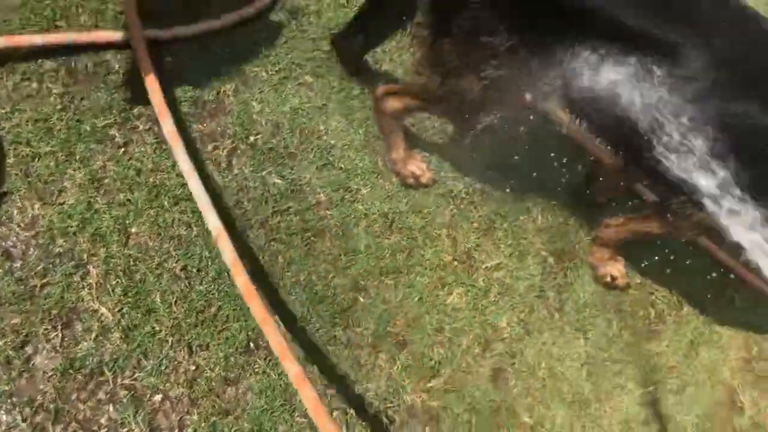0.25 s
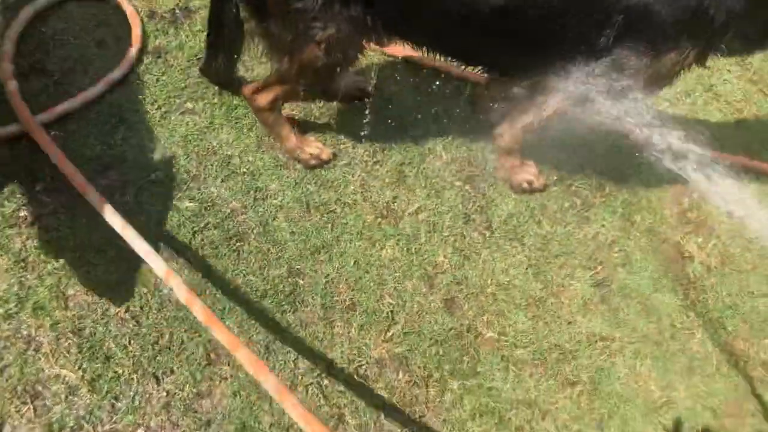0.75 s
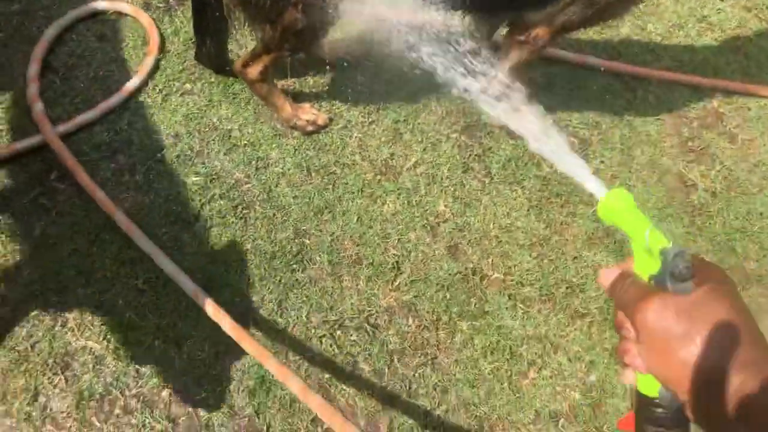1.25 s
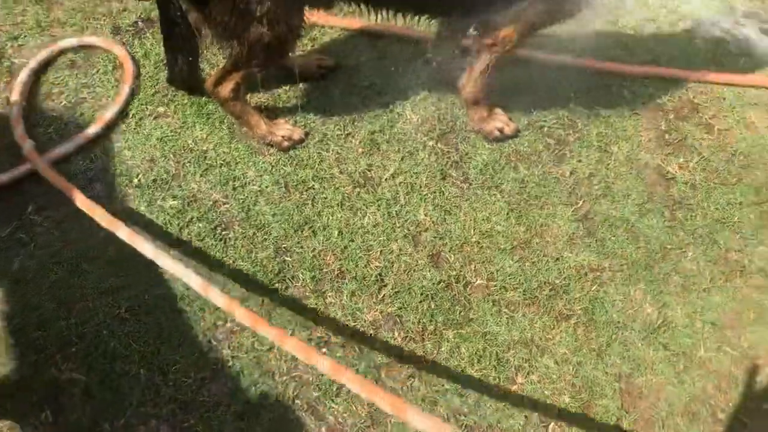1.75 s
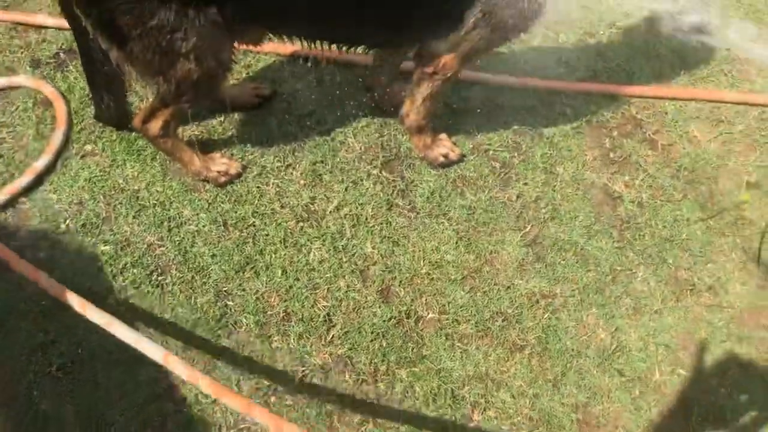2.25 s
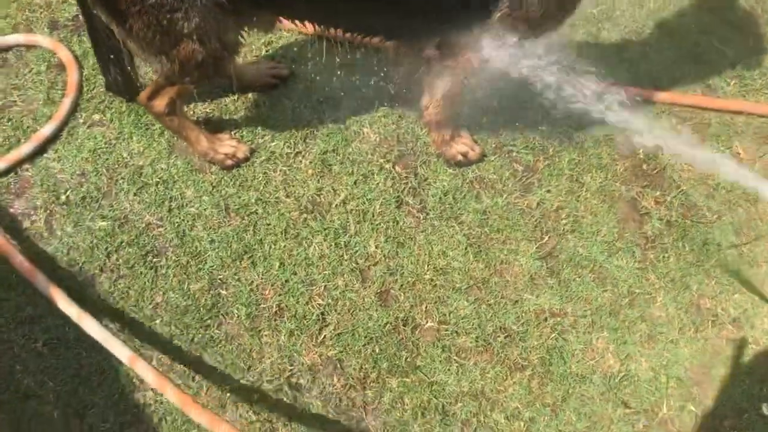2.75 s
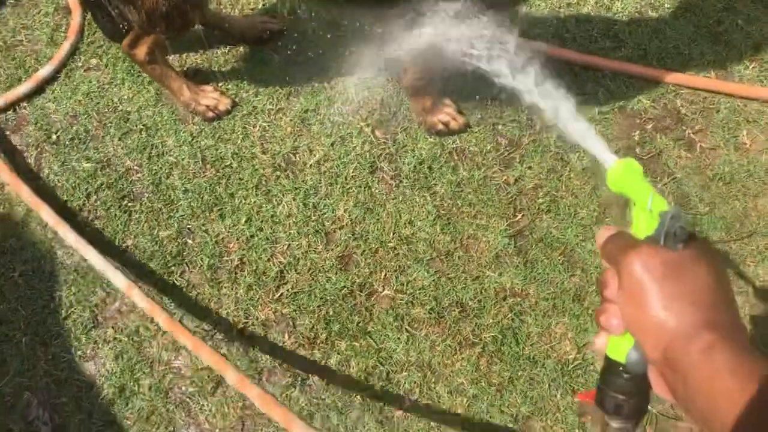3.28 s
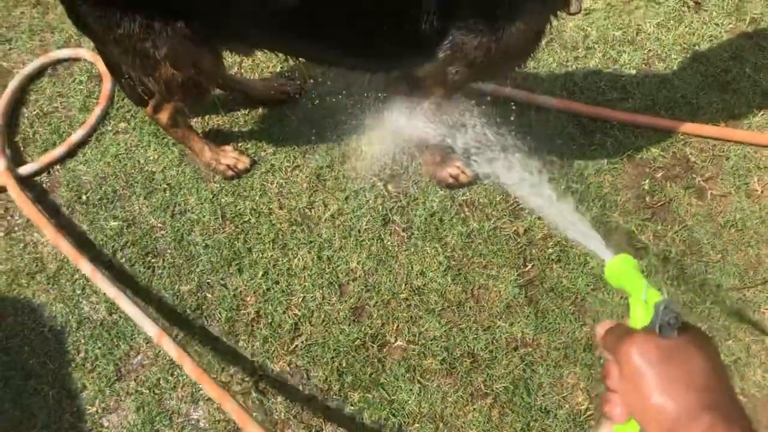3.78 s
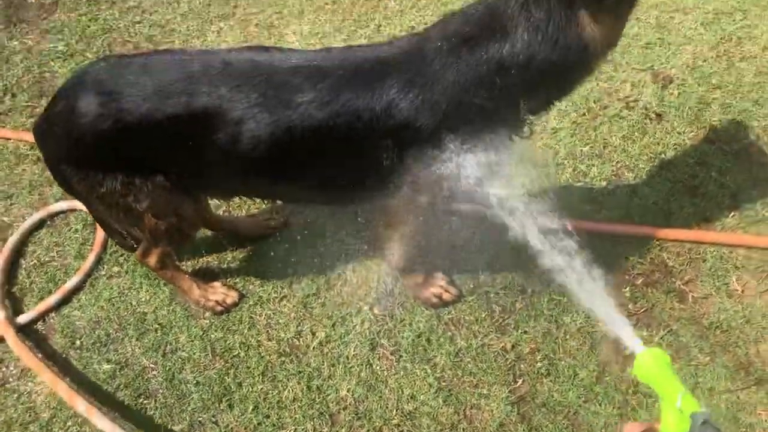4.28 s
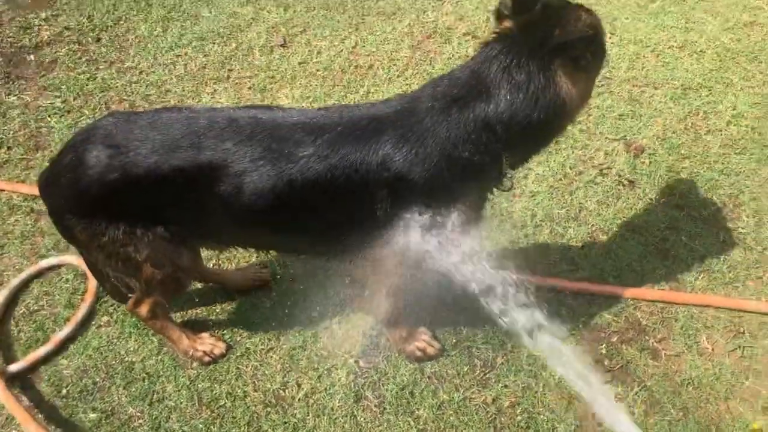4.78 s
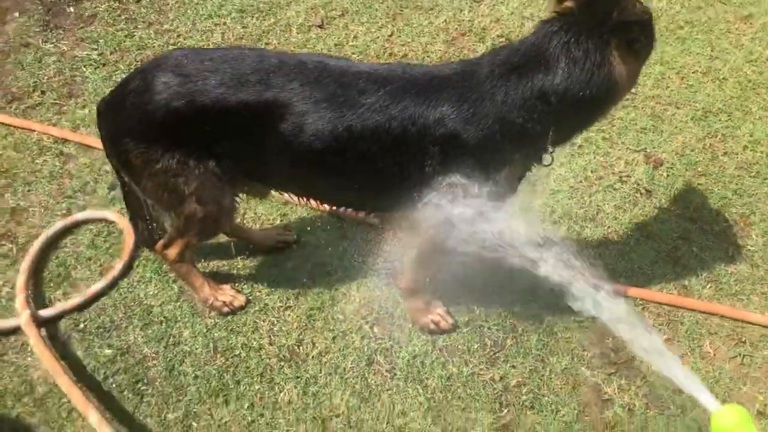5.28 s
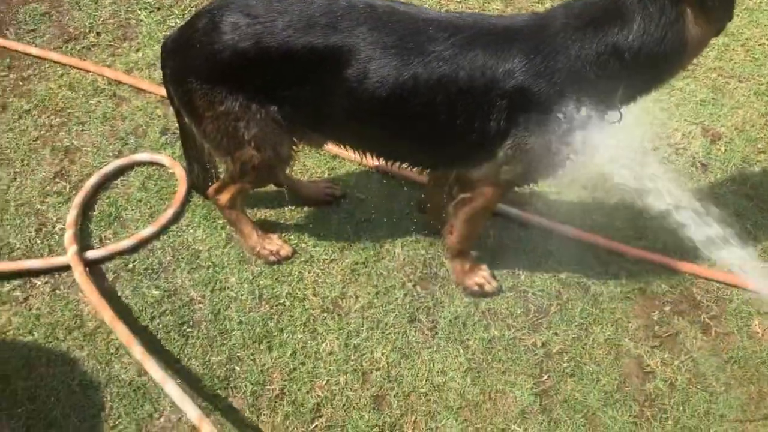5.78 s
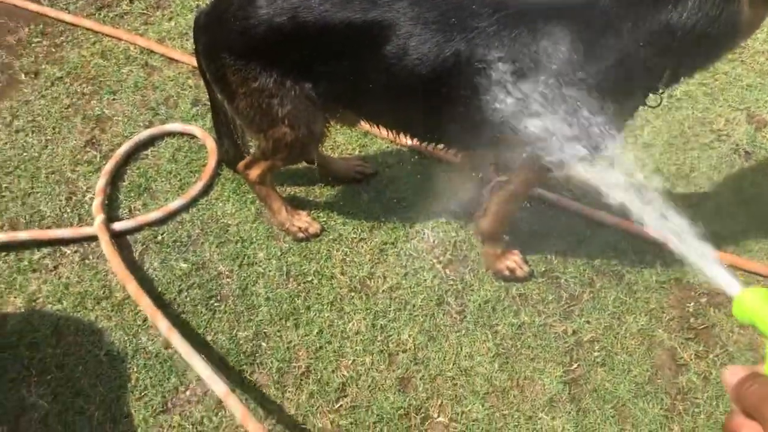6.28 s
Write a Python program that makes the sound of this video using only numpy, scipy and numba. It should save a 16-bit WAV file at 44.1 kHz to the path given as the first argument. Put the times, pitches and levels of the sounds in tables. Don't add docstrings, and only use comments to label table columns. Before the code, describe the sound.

Bright, whistling water spray hisses without pause, pattering on soaked fur and grass outdoors; distant vehicles rumble and two soft knocks come late.

```python
import sys
import numpy as np
from scipy import signal
from scipy.fft import rfft, irfft
from scipy.io import wavfile
from scipy.ndimage import uniform_filter1d, map_coordinates
from numba import njit

SR = 44100
rng = np.random.default_rng(int(sys.argv[2]) if len(sys.argv) > 2 else 0)


def wav_record(signal):
    frames = np.transpose(np.atleast_2d(signal))
    bounded = np.clip(frames, -1, 1)
    quanta = np.round(bounded * 32767).astype(np.int16)
    wavfile.write(sys.argv[1], SR, quanta)


def ratio_of_db(decibels):
    return 10 ** (np.asarray(decibels, float) / 20)


N = 288352
TIME = np.arange(N) / SR


def unit(x):
    return x / np.sqrt(np.mean(x ** 2))


def noise():
    return rng.standard_normal(N)


def tone(hz):
    return np.sin(2 * np.pi * np.cumsum(hz) / SR)


def curves(table):
    s, *columns = np.transpose(table)
    return [np.interp(TIME, s, column) for column in columns]


def swells(events, floor_db, column):
    power = np.full(N, ratio_of_db(floor_db) ** 2)
    for row in events:
        middle, length = row[:2]
        start = max(int((middle - length / 2) * SR), 0)
        span = slice(start, int((middle + length / 2) * SR))
        power[span] += ratio_of_db(row[column]) ** 2 * np.cos(np.pi * (TIME[span] - middle) / length) ** 2
    return 10 * np.log10(power)


def walk(rate):
    hold = int(SR / rate)
    steps = np.repeat(rng.standard_normal(N // hold + 1), hold)
    return 1.1 * uniform_filter1d(uniform_filter1d(steps, hold), hold)[:N]


@njit
def svf(x, hz, q):
    y, band, low, damping = np.empty(len(x)), 0., 0., 1 / q
    for i in range(len(x)):
        g = np.tan(np.pi * hz[i] / SR)
        v = (band + g * (x[i] - low)) / (1 + g * (g + damping))
        band, low, y[i] = 2 * v - band, low + 2 * g * v, damping * v
    return y


def ring(x, hz, q):
    hz = np.clip(hz + np.zeros(N), 20, .42 * SR)
    return unit(svf(svf(x, hz, q), hz, q) / np.sqrt(hz))


def drops(per_s, spread_db, stream):
    size = np.minimum(rng.exponential(size=N), 3.5)
    landed = rng.random(N) < per_s / SR
    hits = landed * ratio_of_db(spread_db * size) * rng.choice([-1, 1], N)
    return unit(hits) + stream * noise()


def echo(x, delay_ms):
    return map_coordinates(x, [np.arange(N) - delay_ms * SR / 1000], order=2)


# (t/s, bore whistle f/Hz, hiss level/dB with distance, splash centre f/Hz)
GUN_HAND = [(0, 7540, -30.5, 4630), (.32, 7700, -28, 4250), (.6, 7200, -31, 4540), (.9, 7370, -30.7, 4470),
            (1.2, 7900, -30, 4550), (1.7, 7600, -30.5, 4150), (2.1, 7400, -30, 4400),
            (2.5, 7640, -29.5, 3930), (3.1, 7600, -29.2, 4300), (3.5, 7700, -29, 3970),
            (3.8, 7000, -30.5, 4020), (4.25, 6600, -30.5, 3870), (4.55, 6600, -29.1, 3500),
            (4.9, 7000, -30.8, 3100), (5.35, 7500, -29.5, 3630), (5.7, 7600, -32.5, 3920),
            (6.0, 7700, -31, 3740), (6.54, 7900, -27.5, 4040)]
# (middle t/s, length t/s, splash level/dB, mist level/dB)
SPRAY_SHEETS = [(0.02, 0.41, -32.5, -40.5), (0.26, 0.82, -35.5, -37.5), (0.72, 0.48, -41, -43.0),
                (0.96, 0.45, -39.5, -46), (1.34, 0.34, -39, -42), (1.54, 0.32, -37.0, -43),
                (1.75, 0.51, -36, -41.5), (2.03, 0.24, -35.5, -39), (2.26, 0.28, -33.5, -39),
                (2.4, 0.17, -29.5, -39), (2.56, 0.38, -30, -39), (2.66, 0.45, -40.0, -42.0),
                (2.92, 0.34, -45, -41), (3.06, 0.18, -34.5, -40), (3.22, 0.6, -41.5, -40.5),
                (3.39, 0.25, -35.5, -39), (3.55, 0.35, -35.5, -40.5), (3.68, 0.43, -39.5, -40),
                (3.91, 0.24, -34.5, -37), (4.15, 0.45, -31.5, -37), (4.3, 0.16, -38, -38),
                (4.4, 0.62, -31.5, -39), (4.72, 0.52, -35.5, -41.5), (4.97, 0.73, -36.5, -41),
                (5.27, 0.55, -38, -40.5), (5.5, 0.74, -31, -42), (5.77, 0.23, -33.0, -41),
                (5.98, 0.29, -30.5, -39), (6.17, 0.34, -30.5, -37.5), (6.42, 0.48, -30.5, -36.5)]
# (t/s, delay via the lawn/ms, share/1, delay via the dog's flank/ms, share/1)
NOZZLE_ECHOES = [(0, 4.2, .2, 5.1, .1), (.65, 4.1, 0.31, 9, .1), (1.1, 4.4, .3, 7, .2),
                 (1.4, 4.5, .05, 8.5, .2), (1.5, 4.0, .05, 6.45, .2), (1.65, 4.0, .35, 6.8, 0.22),
                 (1.95, 4.5, .25, 6.4, 0.41), (2.3, 3.3, .05, 6.4, .05), (2.8, 4.9, .15, 5.1, .05),
                 (3.2, 5, .3, 4.8, 0.21), (3.75, 6.2, 0.18, 4.7, .05), (4.5, 4.6, .05, 9.1, .05),
                 (5.1, 4.9, 0.38, 5, .15), (5.4, 5.2, .3, 4.8, .3), (5.9, 4.6, .25, 6.7, 0.23),
                 (6.54, 5.0, .1, 5.5, .1)]


def nozzle():
    whistle_hz, hiss_db, _ = curves(GUN_HAND)
    hiss_hz = 7500 + .55 * (whistle_hz - 7500)
    mist_db = swells(SPRAY_SHEETS, -43.5, 3)
    lawn_ms, lawn, flank_ms, flank = curves(NOZZLE_ECHOES)

    sputter = walk(9.6)
    hiss_db = hiss_db - 2.3 + 0.95 * sputter + 1.2 * walk(14) + 0.49 * walk(35)
    fizz_db = mist_db + 5.3 + .8 * sputter + 1.1 * walk(13)
    fine_db = mist_db + 6.5 + .8 * sputter + 1.4 * walk(18) + .6 * walk(30)
    hiss = ring(drops(9000, 3.0, 1.4), hiss_hz, 1.63) * ratio_of_db(hiss_db)
    fizz = ring(drops(9000, 2.5, 1.4), 8430, 0.85) * ratio_of_db(fizz_db)
    mist = ring(drops(9000, 2.2, 1.9), 15450, 0.68) * ratio_of_db(fine_db)

    jet = hiss + fizz
    back = lawn * echo(jet, lawn_ms) + flank * echo(jet, flank_ms)
    return (jet + back) / np.sqrt(1 + lawn ** 2 + flank ** 2) + mist


def whistle():
    hz, hiss_db, _ = curves(GUN_HAND)
    wavering_hz = hz * (1 + .035 * walk(9))
    return ring(noise(), wavering_hz, 6.5) * ratio_of_db(hiss_db - 7 + 2.4 * walk(10))


# (middle t/s, length t/s, drumming level/dB, slap level/dB)
COAT_STROKES = [(0.05, 0.2, -34.5, -48), (0.2, 0.32, -31, -37.5), (0.27, 0.25, -27.5, -45),
                (0.43, 0.33, -31, -39), (0.63, 0.22, -42, -39.5), (0.8, 0.27, -38, -39.5),
                (0.98, 0.35, -36.5, -45), (1.36, 0.36, -32.5, -58.0), (1.61, 0.53, -34.5, -44),
                (1.71, 0.16, -31, -46), (1.84, 0.25, -46.5, -43), (2.03, 0.21, -35, -39),
                (2.25, 0.24, -35, -39), (2.43, 0.33, -35, -52), (2.58, 0.18, -34.5, -58.0),
                (2.7, 0.27, -33, -58.0), (3.05, 0.17, -38, -58.0), (3.37, 0.21, -32.5, -58.0),
                (3.62, 0.18, -32.5, -58.0), (4.0, 0.34, -33.0, -55.5), (4.25, 0.39, -35, -38.5),
                (4.37, 0.11, -35, -39), (4.63, 0.64, -37.0, -39.5), (4.9, 0.52, -42.5, -40.5),
                (5.28, 0.58, -38.5, -36.5), (5.53, 0.34, -42, -35), (5.73, 0.39, -36, -38),
                (5.98, 0.27, -33.5, -33.5), (6.18, 0.3, -33.5, -33.5), (6.41, 0.39, -34, -31)]
# (t/s, drumming centre f/Hz)
COAT_PATCH = [(0, 1170), (.16, 1390), (.3, 1250), (.5, 1460), (1.07, 1430), (1.3, 1440), (1.75, 1500),
              (2.05, 1420), (2.3, 1400), (2.55, 1430), (2.72, 1230), (3.06, 1520), (3.4, 1310),
              (3.62, 1460), (4.0, 1370), (5.26, 1340), (5.9, 1300), (6.54, 1450)]


def drum(surge):
    drum_db = swells(COAT_STROKES, -44.5, 2)
    drum_hz = curves(COAT_PATCH)[0] * (1 + .03 * walk(8))
    skin = np.zeros(N)
    for ratio, db in ((.72, -3.5), (1.01, 0.5), (1.33, -2)):
        waver = ratio_of_db(db + 1.06 * walk(14))
        skin += waver * ring(drops(3000, 3.9, 1.07), ratio * drum_hz, 1.84)
    return unit(skin) * ratio_of_db(drum_db + 0.72 * surge + 0.42 * walk(40))


def slap(surge):
    slap_db = swells(COAT_STROKES, -52.5, 3)
    slap_hz = 2300 * (1 + 0.09 * walk(10))
    return ring(drops(4000, 2.5, 1.17), slap_hz, 1.1) * ratio_of_db(slap_db + 0.68 * surge + 0.65 * walk(25))


def splash(surge):
    splash_db = swells(SPRAY_SHEETS, -42, 2)
    splash_hz = curves(GUN_HAND)[2]
    fine = drops(5000, 4.5, 0.83)
    spatter = ring(fine, splash_hz, 0.87) + ratio_of_db(2.5) * ring(fine, 4900, 0.6)
    return unit(spatter) * ratio_of_db(splash_db + 1.4 * surge + 0.29 * walk(30))


def landing():
    surge = walk(18)
    return drum(surge) + slap(surge) + splash(surge)


# (start t/s, length t/s, f/Hz, level/dB)
WET_HOLLOWS = [(.1, 0.37, 2240, -47), (1.66, 0.2, 1970, -44), (2.3, 0.42, 3400, -40.5),
               (2.32, 0.25, 4600, -41), (2.546, 0.19, 367, -50.5), (3.3, 1, 420, -53),
               (4.092, 0.41, 2800, -43), (4.118, .35, 4000, -43), (4.62, .72, 3220, -38.5),
               (2.75, 1.2, 2850, -48), (5.3, 0.32, 2427, -45), (5.88, 0.15, 2720, -36.5),
               (6.14, 0.1, 1400, -36), (6.325, 0.11, 1430, -33.5), (6.15, 0.4, 116, -44),
               (0, 0.23, 430, -48.5)]


def hollows():
    out = np.zeros(N)
    for start, length, hz, db in WET_HOLLOWS:
        swell = np.sin(np.pi * np.clip((TIME - start) / length, 0, 1))
        out += ratio_of_db(db) * swell * ring(noise(), hz, 5.6)
    return out * ratio_of_db(1.5 * walk(17))


# (f/Hz, level/dB per Hz)
YARD_COLOUR = [(15, -42), (25, -21), (54, -1.5), (81, 3), (109, -1), (168, -7.5), (217, -9.5), (401, -8),
               (509, -14), (719, -12), (900, -16.5), (1170, -34), (1980, -120)]


def yard():
    hz = np.fft.rfftfreq(N, 1 / SR) + 1
    colour_hz, colour_db = np.transpose(YARD_COLOUR)
    colour = np.interp(np.log(hz), np.log(colour_hz), colour_db)
    return unit(irfft(rfft(noise()) * ratio_of_db(colour), N)) * ratio_of_db(-43.5)


# (middle t/s, length t/s, level/dB)
FAR_VEHICLES = [(0, .24, -37), (.35, 0.54, -44), (1.1, 1.6, -42), (1.9, .6, -47), (2.42, 0.31, -54),
                (2.9, .5, -45), (3.26, .24, -40), (3.65, .8, -42), (4.1, 0.44, -46), (4.45, 0.78, -40),
                (5.02, .5, -41), (5.24, .14, -31), (6.25, .8, -39)]


def traffic():
    rumble_db = swells(FAR_VEHICLES, -53.5, 2)
    hum_hz = 77.8 + (90.7 - 77.8) * np.exp(-TIME / 1.6) + 2.6 * walk(7)
    drone = tone(hum_hz) * ratio_of_db(2.9 * walk(6.7))
    rumble = 0.63 * ring(noise(), 82.4, 2.2)
    return (drone + rumble) * ratio_of_db(rumble_db - 5.0)


# (t/s, firing tone f/Hz, level/dB)
FAR_ENGINE = [
    (0.0, 139.5, -53),
    (0.1, 140, -52),
    (0.55, 140, -49.5),
    (0.82, 124, -50),
    (1.48, 125.5, -45.5),
    (2.05, 127, -54),
    (2.5, 125.9, -54),
]


def engine():
    hz, db = curves(FAR_ENGINE)
    fade = np.clip((FAR_ENGINE[-1][0] - TIME) / 0.22, 0, 1)
    return np.sqrt(2) * tone(hz) * ratio_of_db(db + 0.5 * walk(9.44)) * fade


# (t/s, low f/Hz, high f/Hz, level/dB)
SIDE_FLECKS = [(.37, 5120, 6300, -38), (.72, 5600, 7000, -37), (1.65, 8900, 11200, -38),
               (1.65, 14400, 15700, -44), (2.16, 4220, 5240, -49), (4.6, 13000, 14500, -38),
               (5.11, 6240, 7630, -33), (5.18, 6250, 7700, -34), (5.18, 8900, 10500, -38),
               (5.18, 13700, 15700, -38), (5.48, 6800, 8350, -36), (6.5, 4200, 6400, -32),
               (6.5, 8200, 9700, -33), (6.5, 10300, 11900, -38)]


def side_flecks():
    half = 1024
    out, hz = np.zeros(N + 2 * half), np.fft.rfftfreq(2 * half, 1 / SR)
    for s, low_hz, high_hz, db in SIDE_FLECKS:
        inside = (hz > low_hz) & (hz < high_hz)
        band = irfft(rfft(rng.standard_normal(2 * half)) * inside)
        start = int(s * SR) - half
        out[start:start + 2 * half] += ratio_of_db(db) * unit(band) * signal.windows.hann(2 * half)
    return out[:N]


# (t/s, peak level/dB, start f/Hz, end f/Hz, length t/s)
PHONE_KNOCKS = [
    (5.17, -21.5, 328, 108, 0.0245),
    (5.222, -30, 94.8, 75, 0.036),
]


def knocks():
    out = np.zeros(N)
    for s, db, start_hz, end_hz, length in PHONE_KNOCKS:
        u = np.clip((TIME - s) / length, 0, 1)
        sag = (start_hz - end_hz) * (1 - (1 - u) ** 3) / 3
        phase = 2 * np.pi * length * (end_hz * u + sag)
        out += ratio_of_db(db) * np.sin(np.pi * u ** 0.91) ** 2 * np.sin(phase + 1.5)
    return out


def near_paths(water):
    out = ratio_of_db(0.28) * water
    for delay_ms in (.35, .6, .9, 1.7, 2.8):
        out = out + 0.091 * walk(4.46) * echo(water, delay_ms)
    return out


def scene():
    water = near_paths(nozzle() + whistle() + landing())
    mono = water + hollows() + yard() + traffic() + engine() + knocks()
    return np.array([mono, mono])


def top_cut(x):
    return signal.sosfilt(signal.butter(12, 17010, fs=SR, output="sos"), x)


def record(dry):
    both = dry + side_flecks() * np.array([[1], [-1]])
    below_top = np.fft.rfftfreq(N, 1 / SR) < 15730
    cut = irfft(rfft(both) * below_top, N)
    return top_cut(cut)


dry = scene()
out = record(dry)
wav_record(out)
```